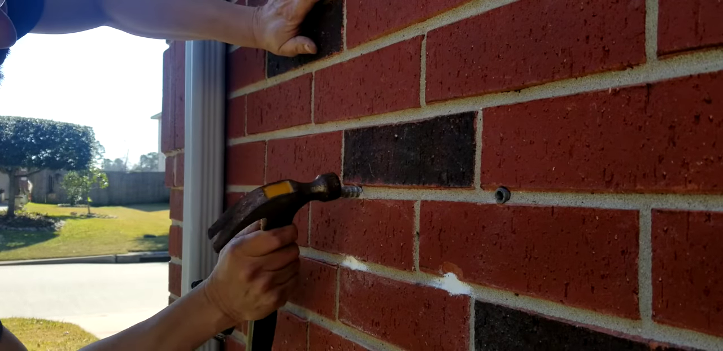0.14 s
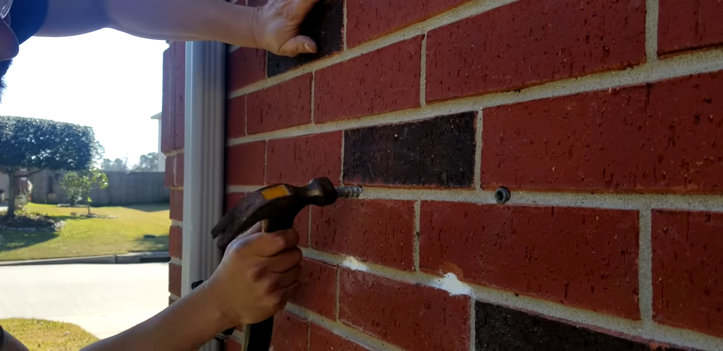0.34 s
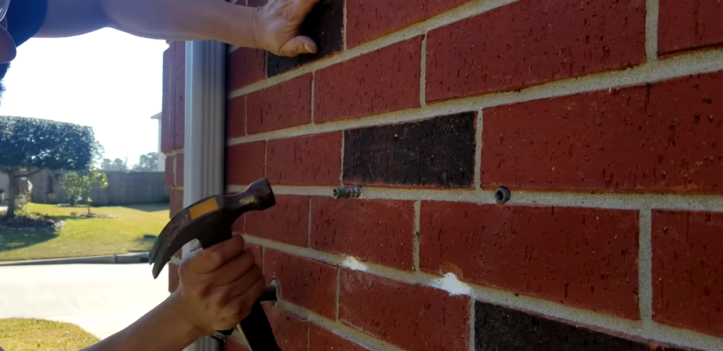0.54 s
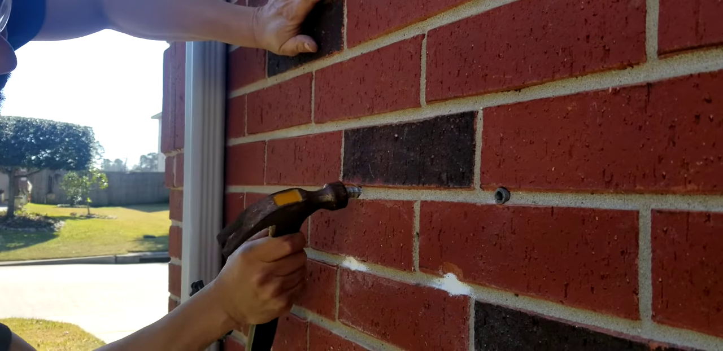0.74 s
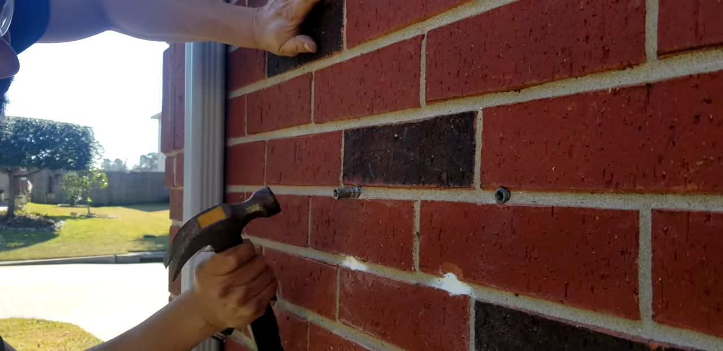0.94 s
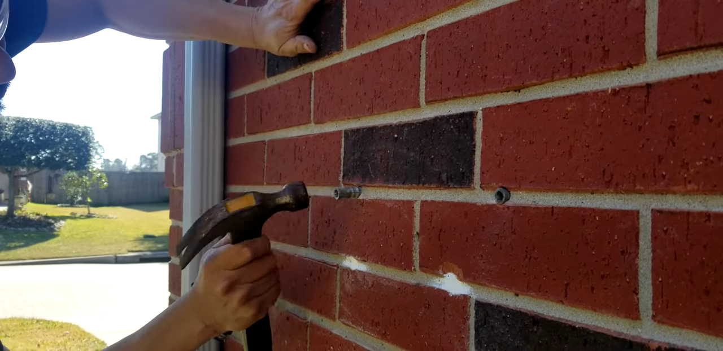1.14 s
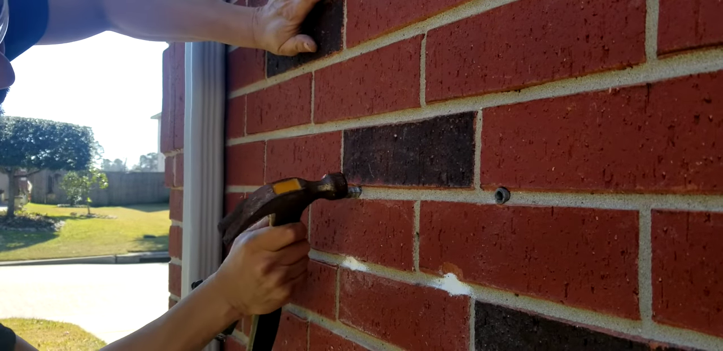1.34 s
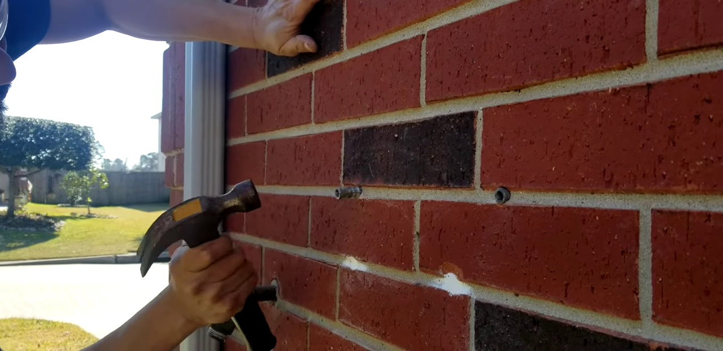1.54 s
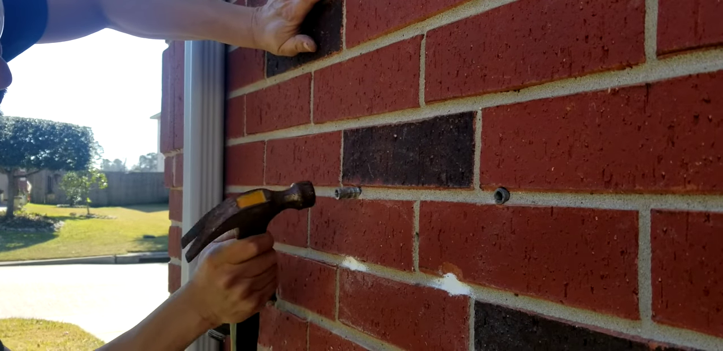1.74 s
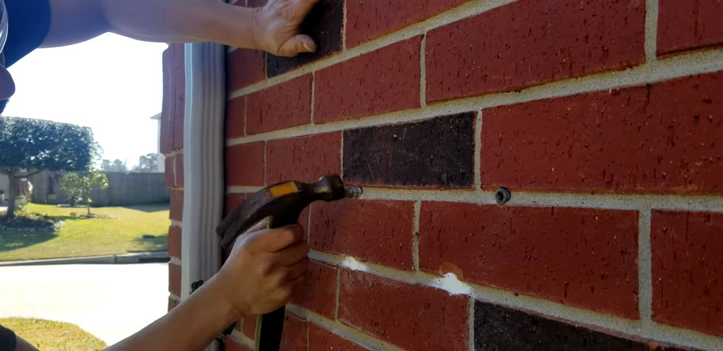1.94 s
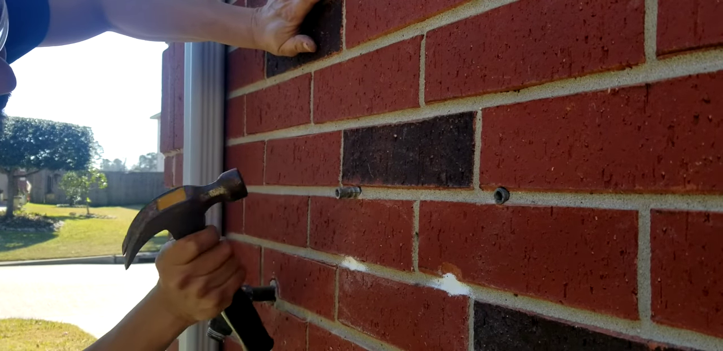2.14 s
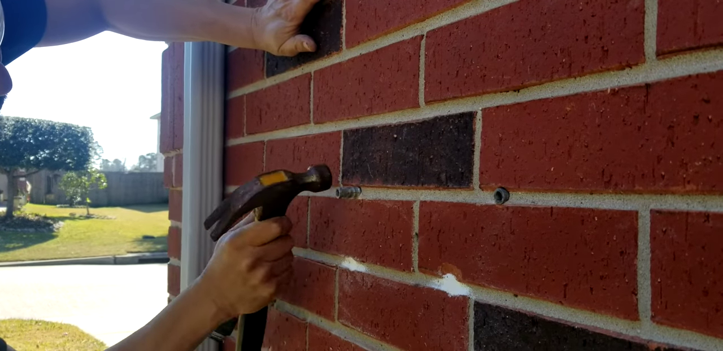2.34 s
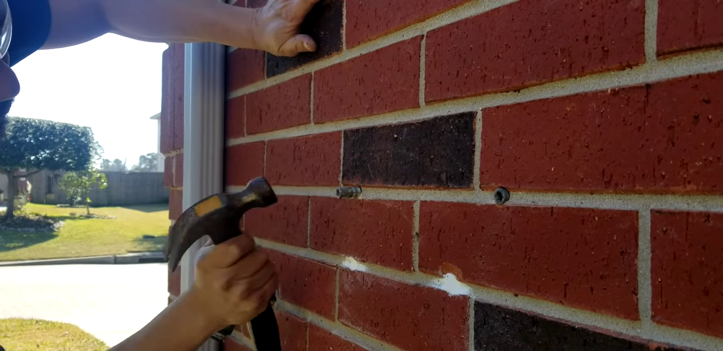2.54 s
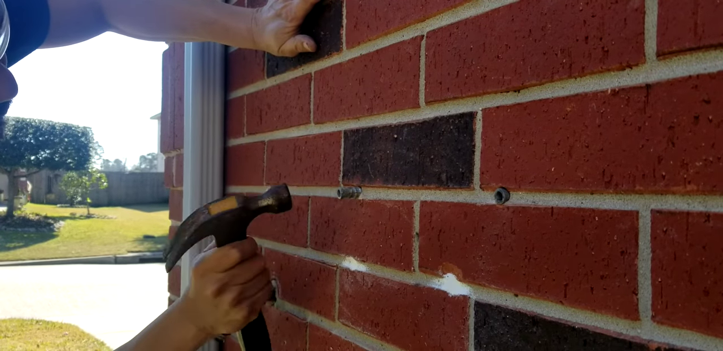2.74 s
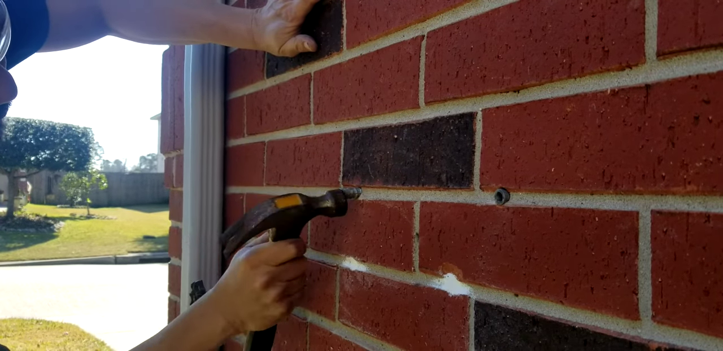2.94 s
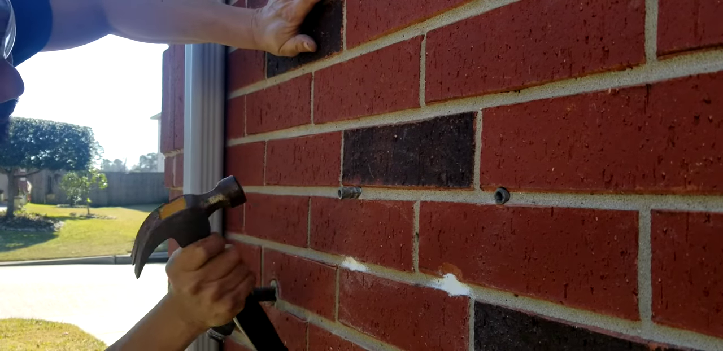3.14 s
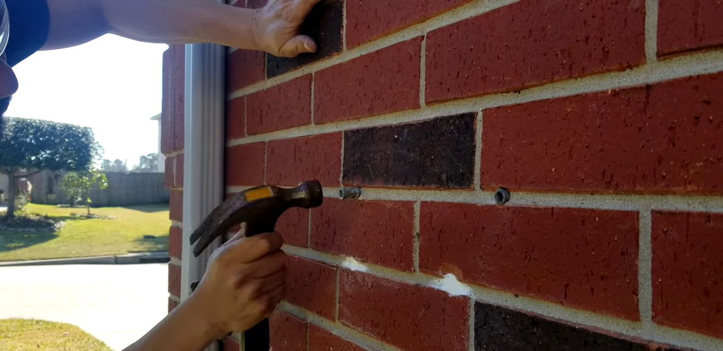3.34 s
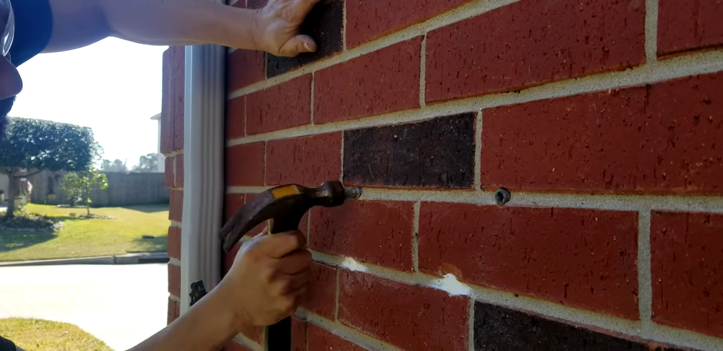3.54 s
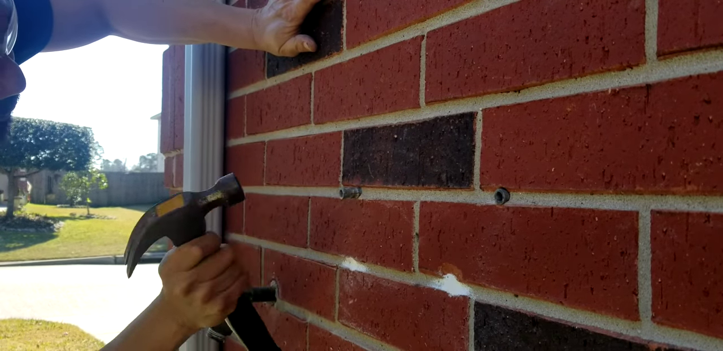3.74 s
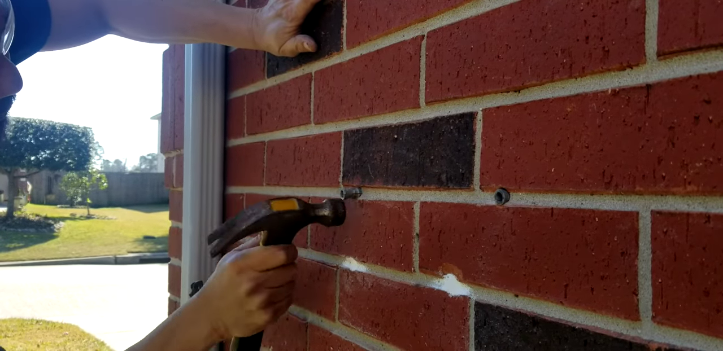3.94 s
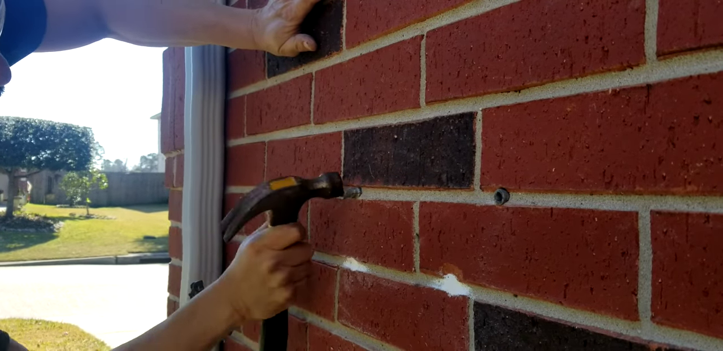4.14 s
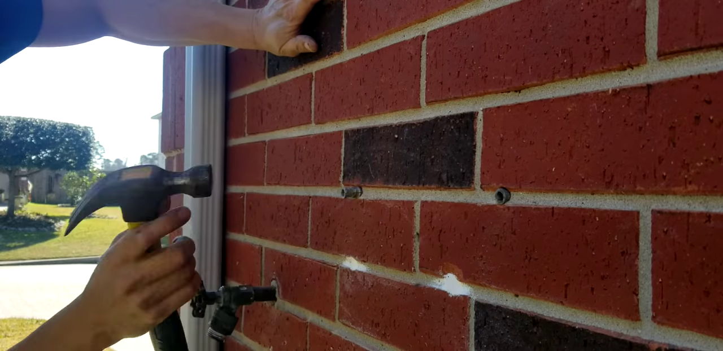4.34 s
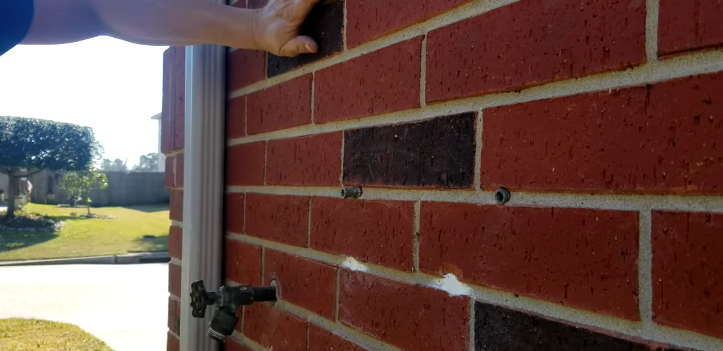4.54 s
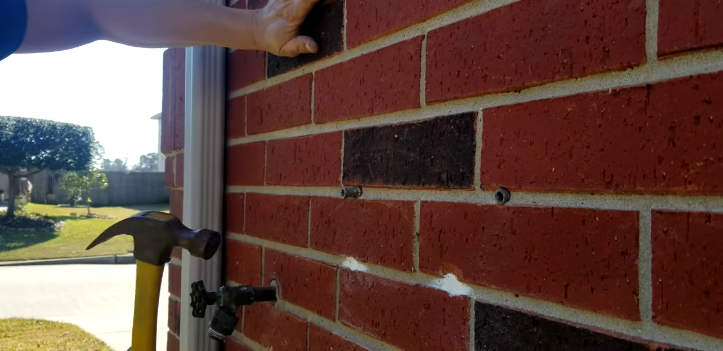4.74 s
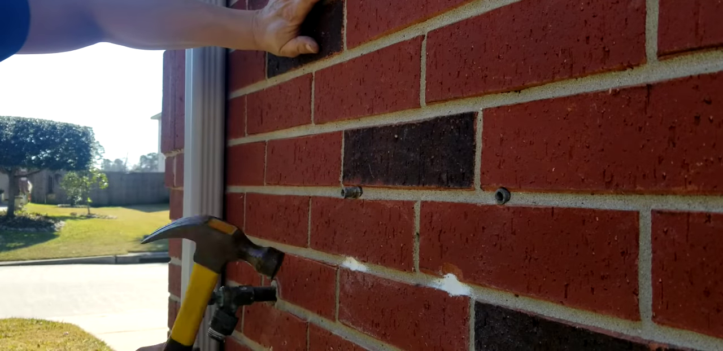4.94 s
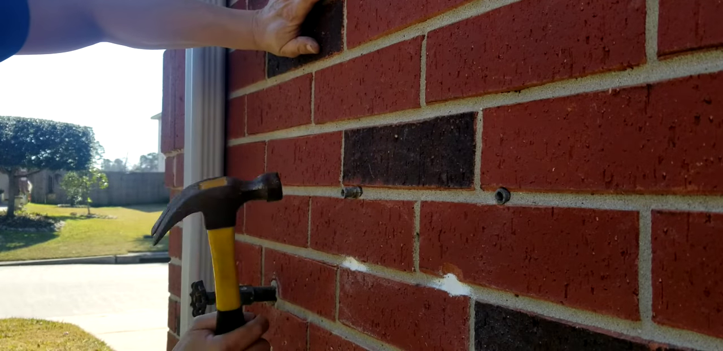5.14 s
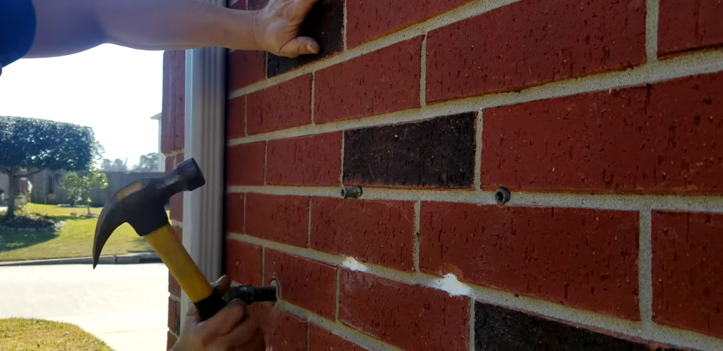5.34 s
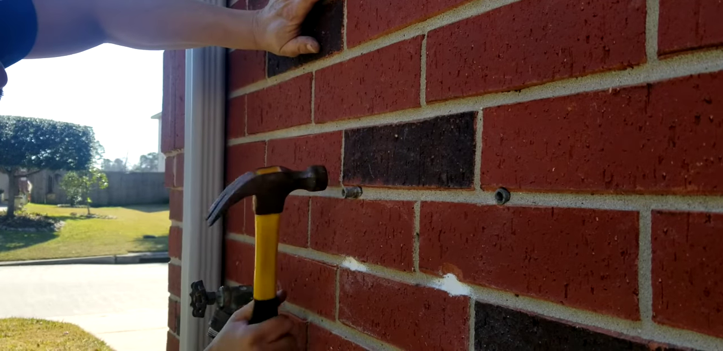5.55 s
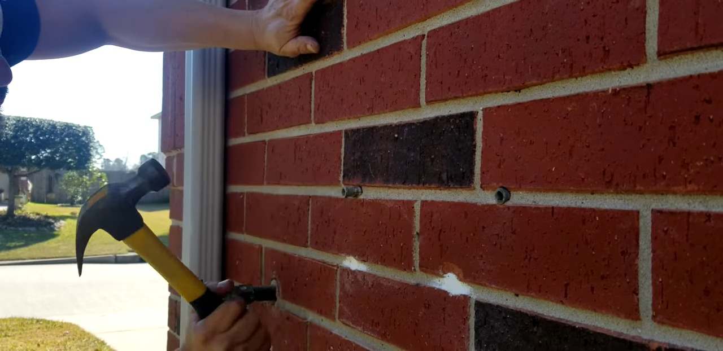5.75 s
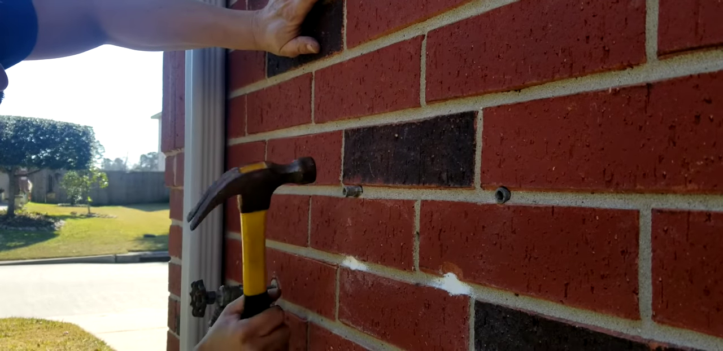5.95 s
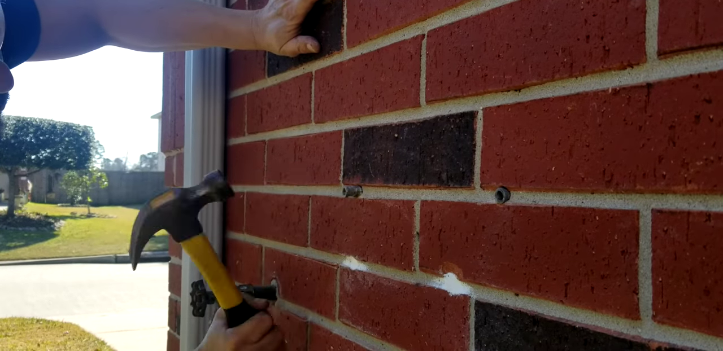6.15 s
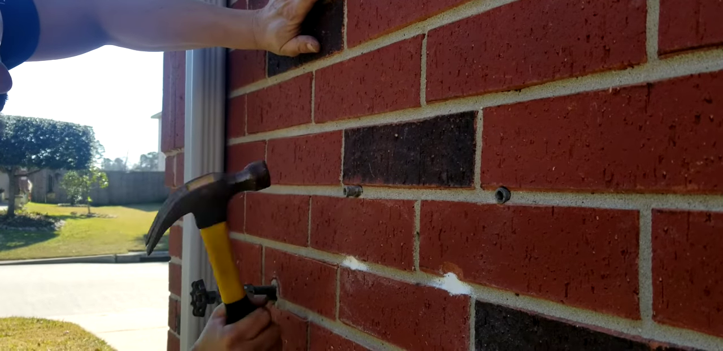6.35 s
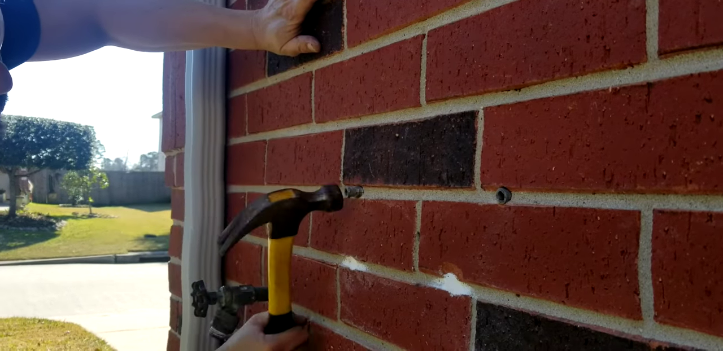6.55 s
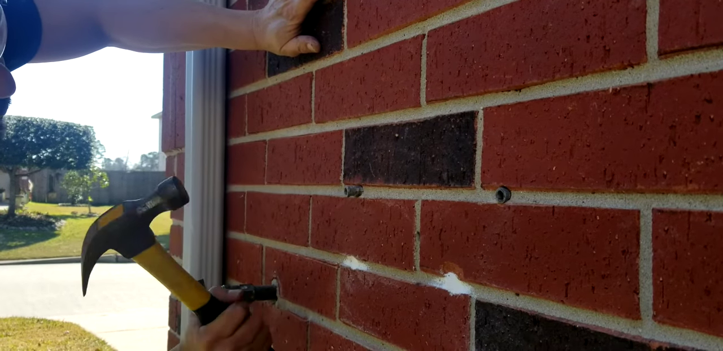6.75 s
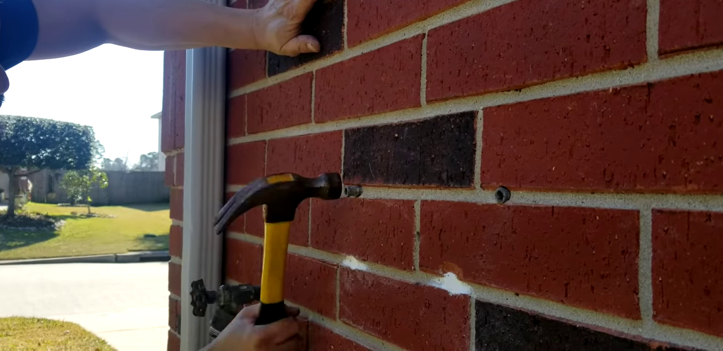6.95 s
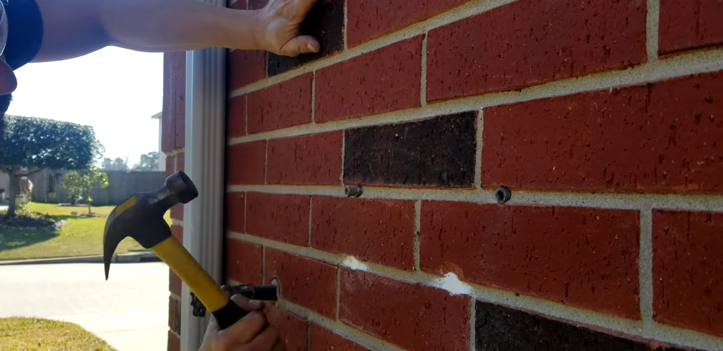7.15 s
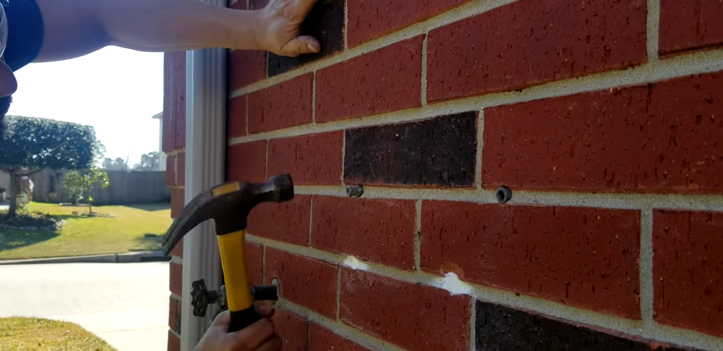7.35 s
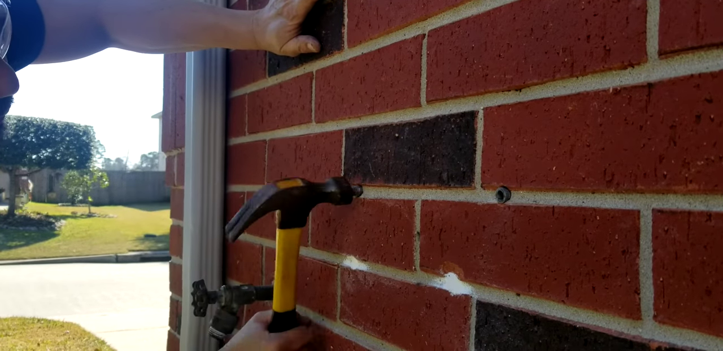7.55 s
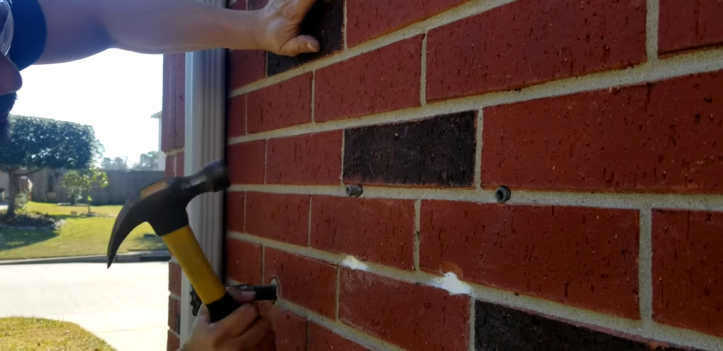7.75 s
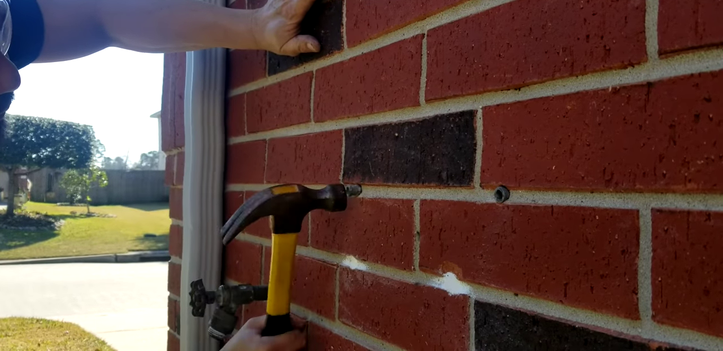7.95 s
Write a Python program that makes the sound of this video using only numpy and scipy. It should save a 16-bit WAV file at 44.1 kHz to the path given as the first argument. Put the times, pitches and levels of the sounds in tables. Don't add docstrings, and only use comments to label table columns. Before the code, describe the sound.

Close stereo pickup outdoors beside a brick house wall. A hammer hits a steel bolt about three times a second, each blow a sharp crack with a hollow woody boom and brief metallic ring. The yard answers with fluttering echoes. After fourteen blows comes a gap of over a second, then eight more, over faint traffic.

```python
import sys
import numpy as np
from scipy import signal
from scipy.fft import rfft, irfft, next_fast_len
from scipy.io import wavfile

SR = 44100
rng = np.random.default_rng(int(sys.argv[2]) if len(sys.argv) > 2 else 0)


def decibels_to_gain(level_db):
    exponent = np.asarray(level_db, float) / 20
    return 10 ** exponent


def store_pcm(level_fs):
    pcm = np.round(np.clip(level_fs, -1, 1) * 32767).astype(np.int16)
    wavfile.write(sys.argv[1], SR, np.atleast_2d(pcm).T)


N = 356769
LEAD = 16384
LEFT_LAG, FACE_LAG = 14, 10


def rms_one(x):
    return x / np.sqrt(np.mean(x ** 2) + 1e-30)


def at_hz(table, hz, count=1):
    table = np.array(table)
    return np.interp(np.log(np.maximum(hz, 1)), np.log(table[:, 0]), table[:, count])


def coloured(size, spectrum):
    white = rng.standard_normal(size)
    length = white.shape[-1]
    hz = np.fft.rfftfreq(length, 1 / SR)
    return rms_one(irfft(rfft(white) * decibels_to_gain(at_hz(spectrum, hz)), length))


def clicks(times, gains):
    out = np.full(N + LEAD, 1e-18)
    out[np.round(np.asarray(times) * SR).astype(int) + LEAD] = gains
    return out


def ring(x, hz, t60):
    r, w = decibels_to_gain(-60 / (t60 * SR)), 2 * np.pi * hz / SR
    return signal.lfilter([0, np.sin(w)], [1, -2 * r * np.cos(w), r * r], x)


def resonance(x, hz, width):
    r, w = np.exp(-np.pi * width / SR), 2 * np.pi * hz / SR
    return signal.lfilter([(1 - r * r) / 2, 0, (r * r - 1) / 2], [1, -2 * r * np.cos(w), r * r], x)


def filtered(x, order, hz, kind="low"):
    return signal.sosfilt(signal.butter(order, hz, kind, fs=SR, output="sos"), x)


def split(x, hz=8500):
    return [filtered(x, 3, hz, kind) for kind in ("low", "high")]


def placed(x, pan_db, lag=LEFT_LAG):
    return np.array([np.roll(x, lag) * decibels_to_gain(pan_db / 2), x * decibels_to_gain(-pan_db / 2)])


def echoes(x, table):
    return sum(decibels_to_gain(db) * np.roll(x, round(s * SR), axis=-1) for s, db in table)


# (frequency [Hz], level [dB per Hz])
TRAFFIC_COLOUR = [(12, -43.5), (20, -10.5), (88, -0.5), (154, -11), (198, -15.5), (337, -25), (377, -33.5),
                  (558, -24.5), (718, -20), (2020, -44.5), (6720, -44), (9300, -49), (12100, -48),
                  (16000, -47)]
# (time [s], level [dB])
TRAFFIC_SWELL = [
    (0, -51.5),
    (4.5, -57.5),
    (4.8, -67),
    (5.2, -65.5),
    (5.451, -56.5),
    (6.501, -52),
    (8.1, -56.5),
]


def traffic():
    s, level_db = np.transpose(TRAFFIC_SWELL)
    mid, side = coloured((2, next_fast_len(N)), TRAFFIC_COLOUR)[:, :N]
    side = filtered(side, 1, 300, "high")
    hum = mid + .8 * side * [[1], [-1]]
    rumble = filtered(hum, 1, 2500)
    swell = decibels_to_gain(np.interp(np.arange(N) / SR, s, level_db))
    return swell * rumble + decibels_to_gain(-68.5) * (hum - rumble)


def yelp():
    start_s, level_db, rise_s, fall_db_per_s = .29, -48, 0.011, 90.5
    top_hz, crest_s, sag_hz = 440, .045, 26
    t = np.arange(N) / SR - start_s
    hz = top_hz - sag_hz * np.minimum(((t - crest_s) / crest_s) ** 2, 2)
    phase = 2 * np.pi * np.cumsum(hz) / SR
    rough = 1 + .3 * rms_one(resonance(rng.standard_normal(N), 40, 50))
    voice = np.sin(phase) + decibels_to_gain(-4.5) * np.sin(2 * phase) + decibels_to_gain(-13.5) * np.sin(3 * phase)
    swell = np.clip(t / rise_s, 0, 1) ** 2
    fade = decibels_to_gain(-fall_db_per_s * np.maximum(t, 0)) * np.clip((.13 - t) / .06, 0, 1)
    return decibels_to_gain(level_db) * swell * fade * rough * voice


# (time [s], peak level [dB], frequency [Hz])
CRUMBS = [
    (4.347, -51, 4500),
    (4.7878, -50.5, 6950),
    (5.2336, -70.5, 9750),
]


def grit():
    t = np.arange(1024) / SR
    out = np.zeros(N + LEAD)
    for (s, db, hz), noise in zip(CRUMBS, rng.standard_normal((len(CRUMBS), len(t)))):
        i = round(s * SR) + LEAD
        out[i:i + len(t)] += decibels_to_gain(db - 1) * resonance(noise * decibels_to_gain(-60 * t / .03), hz, 1800)
    return placed(out, 0.5)


# (frequency [Hz], early level [dB], early t60 [s], late level [dB])
YARD_WASH = [(50, -34.5, 0.51, -38), (103, -30.5, 0.053, -27), (167, -21.5, 0.37, -38),
             (274, -29, 0.24, -32), (500, -30, 0.28, -38), (907, -31.5, 0.025, -38),
             (1490, -25.5, 0.16, -40), (2800, -20, 0.026, -39), (6000, -16.5, 0.032, -42.5),
             (8800, -23.5, 0.035, -34.5), (14900, -20, 0.055, -32)]
# (frequency [Hz], t60 [s])
YARD_DECAY = [(50, 0.62), (250, 0.51), (700, .4), (1300, 0.38), (2000, 0.7), (2600, 0.38), (3600, 0.38),
              (5500, 0.43), (8000, 0.29), (11000, .26), (15000, .23)]


def yard_response():
    t = np.arange(32768) / SR
    hz = np.maximum(np.fft.rfftfreq(len(t), 1 / SR), 1)
    mid, side = rfft(rng.standard_normal((2, len(t))))
    out = np.zeros((2, len(t)))
    for centre in 40 * 2 ** np.arange(0, 9, .5):
        band = np.clip(1 - 2 * np.abs(np.log2(hz / centre)), 0, 1)
        early_db, early_t60, late_db = [at_hz(YARD_WASH, centre, count=c) for c in range(1, 4)]
        early = decibels_to_gain(early_db - 60 * t / early_t60)
        late = decibels_to_gain(late_db - 60 * t / at_hz(YARD_DECAY, centre))
        apart = np.clip(.8 * np.log2(centre / 420) / 3, .04, .9)
        noise = irfft(band * (mid + apart * side * [[1], [-1]]))
        out += noise * (early + late) / np.sqrt(1 + apart ** 2)
    return out * (1 - np.exp(-t / 0.0023))


# (frequency [Hz], width [Hz], level [dB], t60 [s])
SIDING = [(870, 80, -37, 0.5), (1255, 67, -37, .8), (1700, 100, -12.5, 0.84), (2010, 230, -16, 0.91),
          (3400, 73, -35.5, .6), (3930, 90, -28, 0.67), (4500, 90, -33, 0.75), (6264, 1500, -36.5, .3)]


def flutter(x):
    round_trip_s, early_s = .0458, .004
    response, rounds = 0, np.arange(1, 16)
    at = np.round((rounds * round_trip_s - early_s) * SR).astype(int)
    smears = rng.standard_normal((len(SIDING), 90)) * np.hanning(90)
    for (hz, width, level_db, t60), smear in zip(SIDING, smears):
        wave = np.exp(2j * np.pi * hz / SR * np.arange(len(smear)))
        smear = smear / abs(np.sum(smear * wave))
        taps = np.zeros(round(17 * round_trip_s * SR))
        build_up = 1 - np.exp(-rounds / 3.5)
        taps[at] = build_up * decibels_to_gain(level_db - 60 * rounds * round_trip_s / t60)
        taps = np.convolve(taps + echoes(taps, [(.0145, -10)]), smear)
        response = response + resonance(resonance(taps, hz, width), hz, width)
    return placed(signal.fftconvolve(x, response)[:len(x)], 1.0, lag=3)


# (delay [s], level [dB])
FLAT_FACES = [
    (.0445, -28),
    (.063, -31),
    (.091, -35),
    (.137, -43),
]


def slaps(sharp):
    return echoes(sharp[::-1], FLAT_FACES)


# (frequency [Hz], level [dB per Hz])
AFAR_COLOUR = [(710, -42), (1200, -17.5), (1580, -12), (1800, 1), (2080, 0), (2560, -9.5), (2760, -12.5),
               (6710, -16), (7830, -15.5), (9330, -23.5), (11200, -9), (15400, -28), (16000, -30),
               (16500, -51.5)]


def heard_afar(times, crack_db, edge_db):
    loose_dull_db, dull_lasts_s = -5.5, 1.0
    click = np.roll(irfft(decibels_to_gain(at_hz(AFAR_COLOUR, np.fft.rfftfreq(256, 1 / SR)))), 128)
    body, edge = split(click / np.sqrt(np.sum(click ** 2)))
    low, rest = split(body, hz=2020)
    middle, high = split(rest, hz=2855)
    vary_db = 1.2 * rng.standard_normal((len(times), 2))
    dull_db = loose_dull_db * np.exp(-np.maximum(times, 0) / dull_lasts_s)
    low_db = crack_db + 22.5 + vary_db[:, 0]
    middle_db = crack_db + 26.0 + vary_db[:, 1] + dull_db
    parts = [(low_db, low), (middle_db, middle), (crack_db + 21.0, high), (edge_db + 8.0, edge)]
    out = sum(np.convolve(clicks(times, decibels_to_gain(db)), part) for db, part in parts)
    return out[64:64 + N + LEAD]


def steel(times, head_db, bolt_db):
    head_hz, head_t60, stop_s = 6920, 0.12, 0.042
    bolt_hz, bolt_t60 = 5985, 0.006
    t = np.arange(4096) / SR
    stop_fade = 1 / (1 + np.exp((t - stop_s) / 0.0037))
    song = np.sin(2 * np.pi * head_hz * t) * decibels_to_gain(-60 * t / head_t60) * stop_fade
    head = signal.fftconvolve(clicks(times, decibels_to_gain(head_db + 2.5)), song)[:N + LEAD]
    bolt = ring(clicks(times, decibels_to_gain(bolt_db + 12)), bolt_hz, bolt_t60)
    return head, bolt


# (frequency [Hz], level [dB per Hz])
CRACK_COLOUR = [(530, -33.5), (900, 0.5), (1040, -10), (1270, -22), (2240, -30), (3520, -30.5),
                (4380, -17.5), (4830, -19.5), (6540, -24.5), (8550, -35), (11300, -21.5), (15500, -31),
                (16500, -59)]


def crack(times, crack_db, edge_db):
    t = np.arange(2048) / SR
    burst_decay = decibels_to_gain(-60 * t / .014)
    grit_decay = decibels_to_gain(-21.0) * decibels_to_gain(-60 * t / 0.026)
    shape = (1 - np.exp(-t / 0.00053)) * (burst_decay + grit_decay)
    body, edge = split(coloured((len(times), 2, len(t)), CRACK_COLOUR))
    out = np.zeros((2, N + LEAD + len(t)))
    for k, s in enumerate(times):
        burst = shape * (decibels_to_gain(crack_db[k] + 12.5) * body[k] + decibels_to_gain(edge_db[k] + 23) * edge[k])
        i = round(s * SR) + LEAD
        out[1, i:i + len(t)] += burst[0]
        left = decibels_to_gain(-3) * (.85 * burst[0] + .5 * burst[1])
        out[0, i + LEFT_LAG:i + len(t)] += left[:-LEFT_LAG]
    return out[:, :N + LEAD]


def seating(s):
    loose_db, seated_db, seating_s = -3, 0.2, 0.87
    long_grip_s, grip_db, swing_db_per_s = 4.3, -1.7, 0.9
    loose = (loose_db - seated_db) * np.exp(-np.maximum(s, 0) / seating_s)
    swing = (s > long_grip_s) * (grip_db + swing_db_per_s * (s - long_grip_s))
    return seated_db + loose + swing


# (frequency [Hz], level [dB], t60 [s])
WALL_MODES = [(57.5, -32, 0.13), (91.02, -37, 0.7), (116.6, -26.5, 0.34), (173.6, -26.5, 0.23),
              (196.3, -36.5, 0.77), (236, -36.5, 0.62), (271.3, -28.5, 0.36), (288.6, -13.5, 0.09),
              (310.5, -22, 0.17), (359.8, -31.5, 0.47), (467, -32.5, 0.21), (474.3, -12, 0.091),
              (487.4, -20, 0.18), (537.2, -23, 0.2), (552.7, -12.5, 0.076), (590.3, -26.5, 0.17),
              (645, -25.5, 0.19), (682, -27.5, 0.29), (768.2, -19, 0.19), (804.5, -13, 0.073),
              (857, -28, 0.01), (876.5, -31.5, 0.18), (993, -33, 0.19), (1138, -30, 0.073),
              (1150.7, -29, 0.16), (1236.4, -16, 0.031), (1180, -44, .08)]
# (frequency [Hz], level [dB], t60 [s])
BRICK_KNOCK = [(627.5, -4.5, 0.018), (1350, -17, 0.0071), (2076, -17.5, 0.017)]


def wall(times, boom_db, tilt_db):
    push = clicks(times, decibels_to_gain(boom_db + 0.95 * tilt_db))
    out = np.zeros((2, N + LEAD))
    for hz, db, t60 in BRICK_KNOCK:
        lag = FACE_LAG if hz < 1800 else LEFT_LAG
        out -= placed(decibels_to_gain(db) * ring(push, hz, t60), -1.0, lag)
    vary = rng.standard_normal((len(times), len(WALL_MODES)))
    pans = rng.standard_normal(len(WALL_MODES))
    for k, (hz, level_db, t60) in enumerate(WALL_MODES):
        toward = hz < 100 or 150 < hz < 200 or hz > 540
        side = 1 if toward else -1
        strength_db = boom_db + level_db + tilt_db * np.log2(hz / 500) + 2.4 * vary[:, k]
        lag = FACE_LAG if hz > 450 else 7
        mode = ring(clicks(times, side * decibels_to_gain(strength_db)), hz, t60)
        out += placed(mode, -1.4 + 0.7 * hz / 1000 * pans[k], lag)
    paving, far_house = (.0125, -7.5), (.255, -48)   # (delay [s], level [dB])
    return out + echoes(out, [paving, far_house]), push


# (time [s], force [dB], head ring [dB], bolt ring [dB], bright edge [dB])
HAMMER_BLOWS = [(0.056, -0.5, -29, -24, -24), (0.372, 0.5, -26.5, -25, -27), (0.694, -0.5, -28.5, -24, -31),
                (1.004, -1.5, -30, -38.5, -31), (1.317, -1, -32, -42.5, -32),
                (1.636, -1, -36.5, -41.5, -27), (1.939, -1.5, -38.5, -48, -40), (2.271, -2, -42, -43, -31),
                (2.598, -4, -38.5, -25, -34), (2.913, -4, -37.5, -39.5, -29),
                (3.227, -2.5, -39.5, -37.5, -28), (3.563, -2, -46, -26.5, -35),
                (3.866, -2.5, -43, -25.5, -36), (4.144, -2.5, -43, -34, -34), (5.498, 2.5, -38, -38, -32.5),
                (5.855, 0.5, -31.5, -39, -28.5), (6.213, -1, -37, -66, -33), (6.549, -2.5, -53, -60, -42.5),
                (6.894, -2.5, -49, -50, -37), (7.227, -3, -68, -52, -40),
                (7.573, -3.5, -39.5, -26.5, -30.5), (7.928, -3.5, -45, -34, -33)]
BLOW_BEFORE = (-0.23, -7.5, -60, -56.5, -50.5)
# (time [s], crack [dB], boom [dB], bright edge [dB])
HEAD_BOUNCES = [
    (6.6091, -40, -20.5, -53.5),
    (6.9294, -34, -18, -45),
    (7.262, -39, -20, -51),
]


def scene():
    s, boom_db, head_db, bolt_db, edge_db = np.transpose([BLOW_BEFORE] + list(HAMMER_BLOWS))
    bounce_s, bounce_db, bounce_boom_db, bounce_edge_db = np.transpose(HEAD_BOUNCES)
    times = np.r_[s, bounce_s]
    crack_db = np.r_[boom_db - 18, bounce_db + 2.5]
    edge_db = np.r_[edge_db, bounce_edge_db + 4]
    tilt_db = np.r_[seating(s), 11.5 + 0 * bounce_s]

    boom, push = wall(times, np.r_[boom_db + 2, bounce_boom_db - 3], tilt_db)
    head, bolt = steel(s, head_db, bolt_db)
    sharp = crack(times, crack_db, edge_db)

    thud = filtered(push, 4, 1150)
    grains = decibels_to_gain(-11) * sharp[1]
    source = decibels_to_gain(18) * thud + grains + heard_afar(times, crack_db, edge_db) + decibels_to_gain(-3.0) * bolt
    wash = signal.fftconvolve(source[None], yard_response(), axes=1)[:, :N + LEAD]

    blows = boom + sharp + placed(head + bolt, -11.0)
    yard = slaps(sharp) + wash + decibels_to_gain(8.5) * flutter(source)
    near = blows + yard + grit()
    return near[:, LEAD:] + traffic() + yelp()


def low_pass(x):
    return signal.sosfilt(signal.butter(12, 16860, fs=SR, output="sos"), x)


def record(dry):
    rounded = filtered(dry, 2, 34, "high")
    rounded = .97 * np.tanh(rounded / .97)
    mix = filtered(rounded, 12, 16100)
    return low_pass(mix)


dry = scene()
out = record(dry)
store_pcm(out)
```